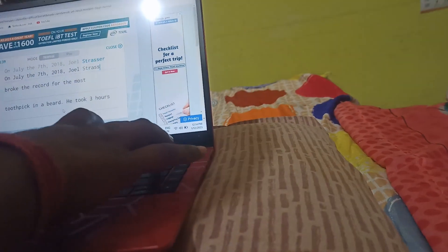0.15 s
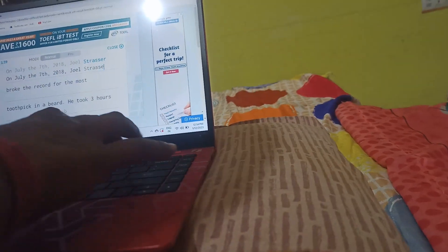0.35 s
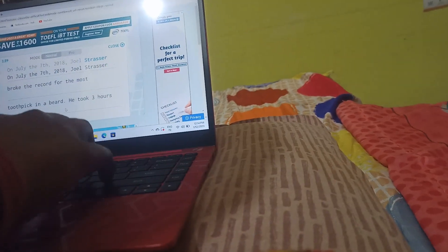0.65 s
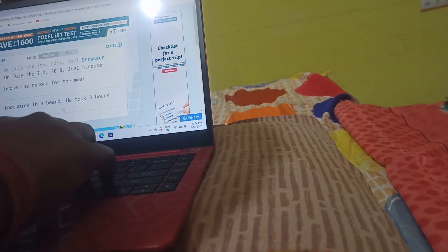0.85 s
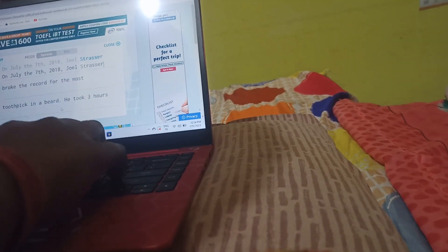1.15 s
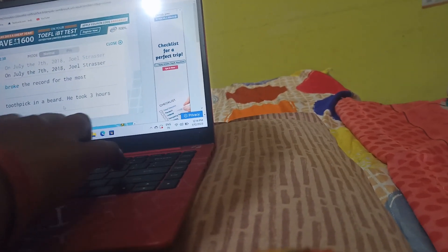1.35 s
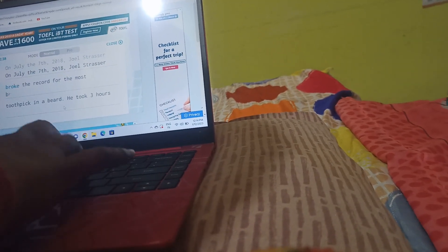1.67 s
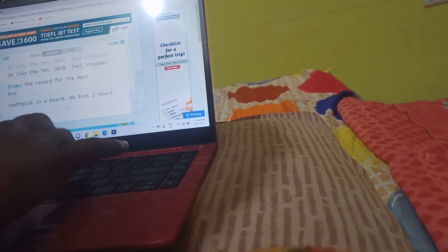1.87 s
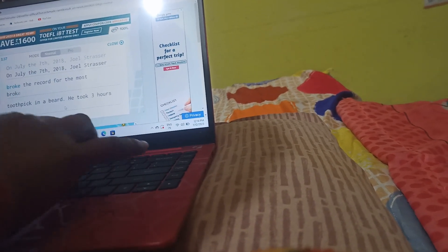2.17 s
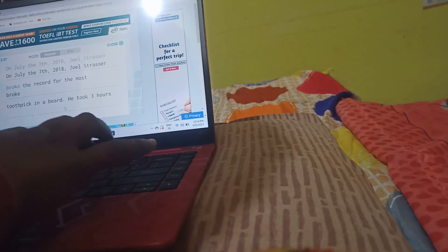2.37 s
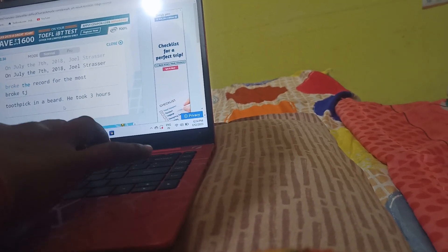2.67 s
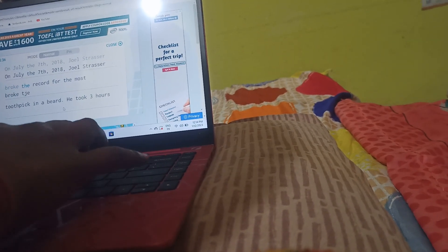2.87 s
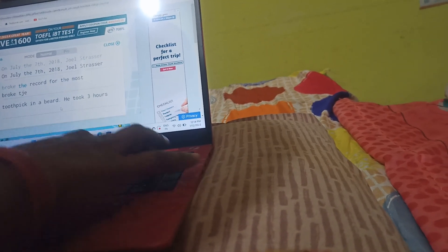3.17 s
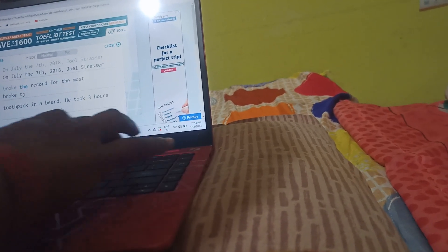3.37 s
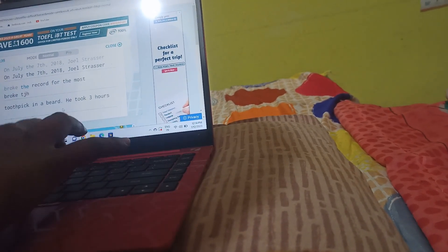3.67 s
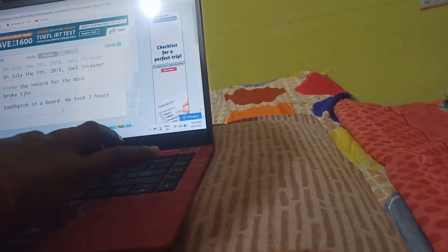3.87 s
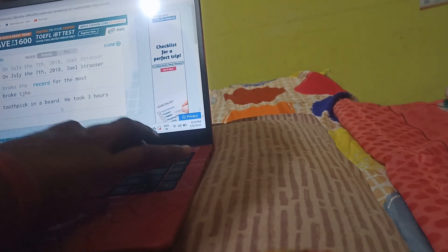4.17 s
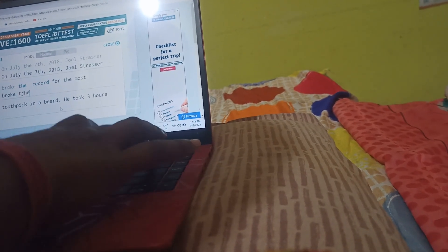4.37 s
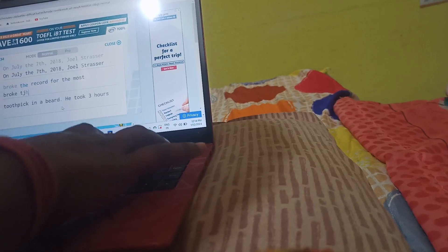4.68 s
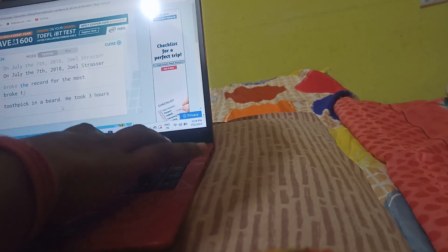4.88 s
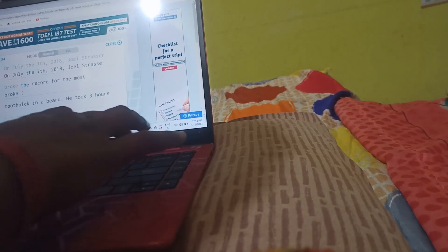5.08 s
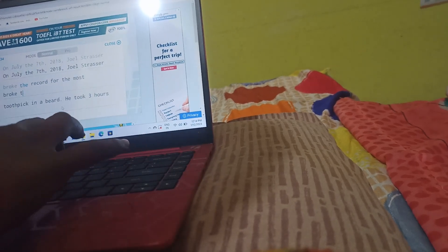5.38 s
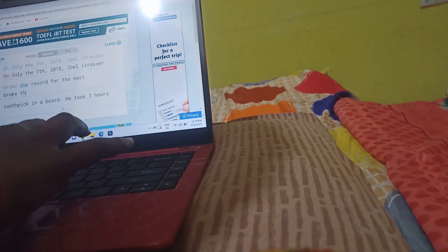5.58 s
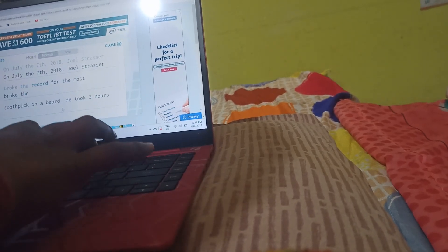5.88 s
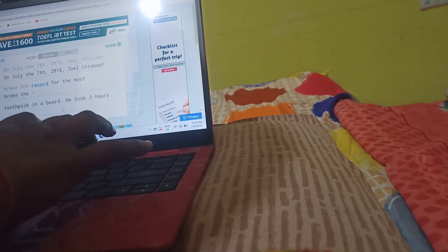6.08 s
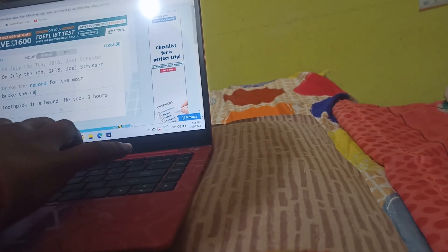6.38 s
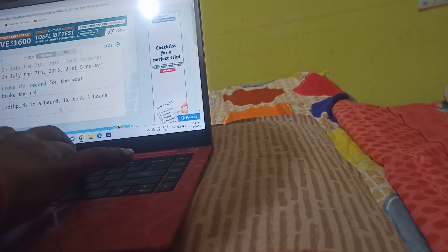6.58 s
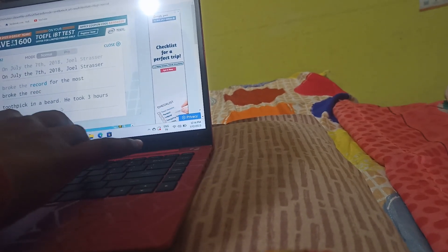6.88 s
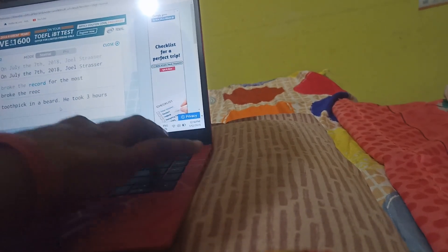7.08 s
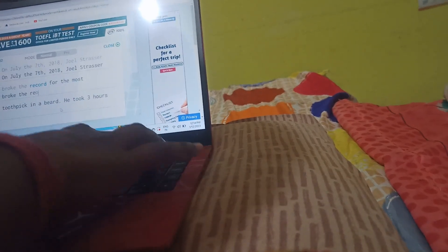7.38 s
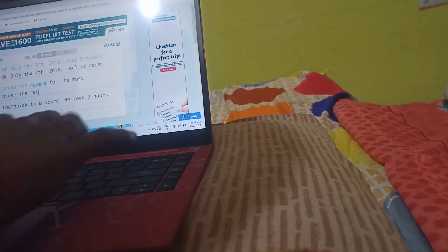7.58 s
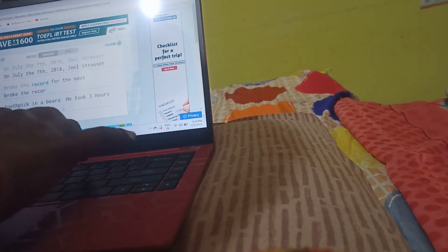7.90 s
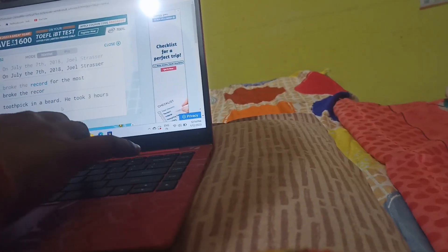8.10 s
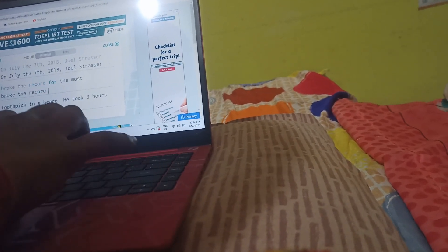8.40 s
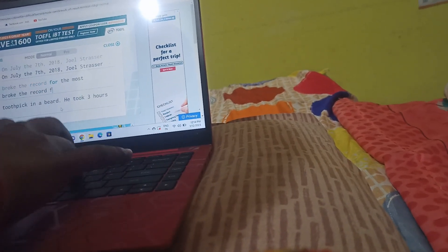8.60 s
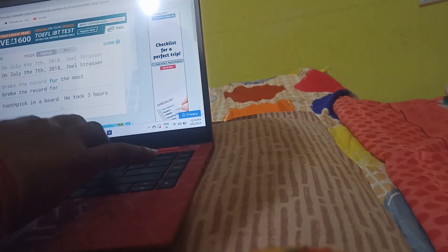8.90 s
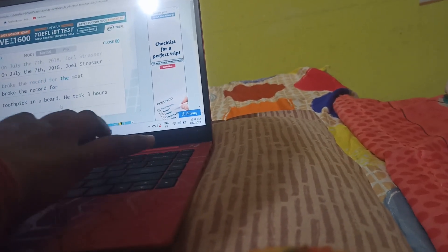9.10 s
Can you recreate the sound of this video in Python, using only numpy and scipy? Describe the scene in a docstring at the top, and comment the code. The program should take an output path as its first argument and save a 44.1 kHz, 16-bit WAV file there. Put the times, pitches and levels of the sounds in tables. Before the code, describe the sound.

A phone vibrating is heard from inside its own case, in a quiet room with faint low noise. The opening has only the falling whirr of a buzz just ended, plus a key tap. Buzzes start near 0.9, 2.9, 4.9, 6.9 and 8.9 seconds, each powered for one second, the last still running at the end. Each begins with a sharp tick and tiny rapid rattle, spins up in a tenth of a second, overshoots, sags to a steady hum around 210 hertz with thin high whine and brushy hiss, then coasts down within a third of a second. Slow, irregular laptop keys click and thump softly throughout, firmer around 7.2 and 9.0. Skin brushes the deck at 4.4 to 4.9. Faint distant wavering tones appear early, near 4.7, and most clearly from 7.5 to 8.1, trailing away by 8.9.

```python
"""A phone's vibration motor buzzes one second on, one second off, heard through the phone's own case.
A spinning off-centre weight hums; brushes and bearing whine and hiss; a loose rotor rattles in short rings.
Each buzz spins up, sags a little in pitch and coasts down; the last is still on when the scene ends.
Someone types slowly on a laptop: bursts of filtered noise click, knock and thump, and skin brushes the deck.
Faint wavering sine tones drift in from far away, over a room tone of low noise."""
import sys
import numpy as np
from scipy import signal
from scipy.fft import rfft, irfft, next_fast_len
from scipy.io import wavfile
from scipy.ndimage import uniform_filter1d, map_coordinates

SR = 44100
rng = np.random.default_rng(int(sys.argv[2]) if len(sys.argv) > 2 else 0)


def generate_wav(sig):
    """Save sig (samples, or channels by samples) to the path in sys.argv[1] as 16-bit PCM at SR."""
    pcm = np.round(np.clip(np.atleast_2d(sig).T, -1, 1) * 32767).astype(np.int16)
    wavfile.write(sys.argv[1], SR, pcm)


N = 407925
TIME = np.arange(N) / SR

# All levels in the tables are relative: gains set later scale them.
# room tone colour: (f/Hz, level/dB)
ROOM_COLOUR = [(15, -53), (25, -17), (156, -2), (509, -24.5), (666, -17.5), (997, -29), (1110, -31),
               (1900, -29.5), (2230, -32.5), (2560, -34), (3440, -31), (4260, -35.5), (5140, -32.5),
               (6380, -47), (15500, -38.5)]
# room tone loudness: (t/s, level/dB)
ROOM_LEVEL = [(0, -65), (.6, -69.5), (2.3, -68), (2.5, -73), (4.3, -73.5), (6.2, -64), (6.8, -71),
              (8.2, -66.5), (8.8, -72)]
# faint far tones: (start t/s, end t/s, f/Hz, level/dB, overtone level/dB)
FAR_TONES = [(-.2, .3, 1140, -80.5, 0.5), (-.2, .45, 1724, -82, -10), (.34, 0.504, 680, -73, -25),
             (.74, .95, 1116, -80.5, -7.5), (4.68, 4.86, 1021, -85, -12),
             (7.55, 8.106, 701.3, -64.5, -18.5), (8.1, 8.881, 680.4, -79.5, -19)]
# skin brushing over the laptop deck: (f/Hz, level/dB)
SLIDE_COLOUR = [(40, -23.5), (160, 3.5), (300, -3), (420, -5), (560, 1.5), (720, -2), (900, -20),
                (1700, -21), (4000, -30.5), (8000, -40)]
# key strokes: (t/s, level/dB, weight/dB: high for a firm press, low for a key let go)
KEYS = [(.002, -53, 4), (.287, -74, 8), (.477, -78, -3), (1.206, -63, 18), (1.542, -57, 12),
        (2.023, -56, 2), (2.167, -52, 9), (2.313, -67, -8), (2.41, -76, 4), (2.54, -69, -12),
        (2.687, -56, 10), (3.279, -52, 1), (3.63, -56, 6), (3.779, -60, 15), (3.933, -52, 10),
        (4.301, -70, -8), (4.498, -69, 12), (4.7, -72, 7), (5.536, -62, 14), (5.835, -60, 17),
        (5.885, -54, -1), (6.261, -66, 11), (6.498, -64.5, 10), (6.599, -66, 3), (7.211, -50, 2),
        (7.398, -51, 5), (7.724, -56, 13), (8.145, -58, 5), (8.322, -64, 2), (8.483, -72, 6),
        (8.618, -63.5, -17), (8.763, -73, -7), (9.041, -48, 7), (9.152, -54, 1)]
# colours of a key's thump, body and click: (f/Hz, level/dB)
THUMP_COLOUR = [(25, -32), (70, -7), (135, 0), (230, -9.5), (340, -16), (700, -49.5), (2000, -72)]
BODY_COLOUR = [(100, -25.5), (300, 6), (500, 9), (800, -5.5), (1300, -22.5), (2500, -34.5), (8000, -62.5)]
CLICK_COLOUR = [(400, -30.5), (1200, -2), (2100, -1.5), (3800, -4.5), (5500, -1), (7500, -15.5),
                (12000, -9), (15500, -22)]
# single ticks of the loose rotor, hard as it breaks free, soft as it drops back:
# (t/s, ring level/dB, dull knock level/dB)
TICKS = [(.9278, -16, -40), (2.1115, -52, -38), (2.9259, -14, -39), (4.1135, -55, -42), (4.9122, -15, -43),
         (4.9254, -15.5, -33), (4.9307, -16, -26), (4.9368, -20, -36), (6.1283, -54, -42),
         (6.9281, -18, -40), (8.938, -19, -39)]
# one row a buzz: (current on t/s, settled speed f/Hz, extra drive at the start f/Hz)
BUZZES = [(-1.11, 210, 44), (.899, 209.4, 46.9), (2.9, 211, 37), (4.901, 214.1, 47), (6.902, 213.2, 41.7),
          (8.904, 214, 40)]
# brushes and bearing over one turn, at cruising speed: (multiple of the speed, level/dB)
TURN = [(5, -45.3), (6, -45.6), (7, -35.1), (8, -26.7), (9, -35.0), (10, -44.8), (11, -39.8), (12, -26.6),
        (13, -33.2), (14, -41.0), (15, -33.3), (16, -37.7), (17, -45.8), (18, -39.4), (19, -40.1),
        (20, -36.8), (21, -36.3), (22, -32.2), (23, -31.9), (24, -27.7), (25, -27.2), (26, -29.6),
        (27, -29.4), (28, -32.5), (29, -30.6), (30, -35.6), (31, -29.3), (32, -30.8), (33, -35.6),
        (34, -35.7), (35, -46.7), (36, -36.8), (37, -26.9), (38, -30.7), (39, -37.5), (40, -26.8),
        (41, -34.6), (42, -24.2), (43, -25.2), (44, -23.5), (45, -34.8), (46, -36.7), (47, -28.1),
        (48, -33.0), (49, -25.6), (50, -24.7), (51, -35.4), (52, -27.2), (53, -27.0), (54, -19.9),
        (55, -21.7), (56, -25.2), (57, -25.1), (58, -30.3), (59, -21.4), (60, -30.1), (61, -22.0),
        (62, -29.0), (63, -31.2), (64, -23.1), (65, -36.2), (66, -38.8), (67, -41.9), (68, -32.2),
        (69, -34.5), (70, -34.5), (71, -35.9), (72, -46.4)]
# how the case carries the motor's sound: (f/Hz, level/dB)
CASE = [(300, -37.5), (1100, -34.5), (1500, -7), (1950, -0.5), (2350, -7.5), (3300, -1), (4200, -9),
        (5300, 1.5), (7500, -12), (9000, 3.5), (12300, 15.5), (14000, 0.5), (15500, -15)]
# hiss of the brushes with the current on, and while coasting: (f/Hz, level/dB)
BRUSH_HISS = [(30, -20), (120, 0), (300, -5), (650, -8), (950, -20), (1800, -13), (2500, -19), (3800, -19),
              (5300, -12), (7500, -17), (9500, -9), (12300, 1), (13500, -2), (14300, -8)]
COAST_HISS = [(30, -18), (150, 6), (500, -2), (1000, -13), (2000, -11.5), (3800, -18.5), (5500, -7.5),
              (6800, -14.5), (7900, -12.5), (8800, 0), (12700, 2), (14300, -3), (15500, -19.5)]
# the shaft's knock against its bearing: (f/Hz, level/dB)
SHAFT_KNOCK = [(300, -26.5), (1200, -17), (1950, 2), (2500, -12.5), (5300, 4), (7500, -2.5), (11000, -1.5),
               (15000, -8.5)]
# the shaft grating on the lowest resonance of the case: (f/Hz, level/dB)
GRATE_COLOUR = [(900, -40), (1500, -7), (1950, 0), (2400, -8), (3600, -10), (6000, -30)]

SLIDE_START_S, SLIDE_END_S, SLIDE_DB = 4.445, 4.92, -64.5
SLIDE_ATTACK_S, SLIDE_RELEASE_S = .03, .22
DULLING = .12  # share of the weight that a firm press moves from the click into the deck
# rattle at switch-on: spacing of its ticks, first and full ring level, time to grow
RATTLE_GAP_S, RATTLE_FIRST_DB, RATTLE_DB, RATTLE_GROW_S = .0061, -45, -27, .014
DULL_FIRST_DB, DULL_DB = -62, -34.5  # first and full level of the dull knock in those ticks
CRUISE_HZ = 215  # motor speed for which TURN holds
ON_S = 1.0  # current stays on this long
STUCK_S = .017  # the rotor is stuck this long before it breaks free
SAG_S = .237  # the extra drive dies away, so the pitch sags
GRATE_DB = -58
TOP_HZ = 15540  # upper edge of the sound


def amp(db):
    """Turns decibels into a gain."""
    return 10 ** (np.asarray(db) / 20)


def unit(x):
    """Scales a sound to rms 1."""
    return x / np.sqrt(np.mean(x ** 2) + 1e-20)


def read(points, hz):
    """Reads a spectrum between its points on a log-frequency axis."""
    f, value = np.transpose(points)
    return np.interp(np.log(hz + 1), np.log(f + 1), value)


def curve(points):
    """Joins (t/s, value) rows with straight lines over the whole scene."""
    return np.interp(TIME, *np.transpose(points))


def colour(x, points):
    """Filters a sound by a spectrum in dB."""
    size = next_fast_len(len(x) + 4096)
    gain = amp(read(points, np.fft.rfftfreq(size, 1 / SR)))
    return irfft(rfft(x, size) * gain, size)[:len(x)]


def noise(points):
    """Makes steady noise of a given colour, rms 1."""
    return unit(colour(rng.standard_normal(N), points))


def wander(per_s):
    """Makes a smooth random curve, rms 1, from per_s random points a second."""
    knots = rng.standard_normal(4096)
    return unit(map_coordinates(knots, [TIME * per_s], order=2, mode="wrap"))


def add(mix, s, sound):
    """Mixes a sound in at time s, in seconds."""
    part = mix[max(round(s * SR), 0):][:len(sound)]
    part += sound[:len(part)]


def room():
    """Room tone: low noise that swells gently."""
    return amp(curve(ROOM_LEVEL) + 0.6 * wander(19)) * noise(ROOM_COLOUR)


def far_tones():
    """Thin sine tones with one overtone, wavering in pitch and level on their way in."""
    out = np.zeros(N)
    clock = np.cumsum(1 + 0.011 * wander(40)) / SR  # uneven time bends the pitch
    for start, end, hz, db, overtone_db in FAR_TONES:
        swell = np.clip(np.minimum(TIME - start, end - TIME) / 0.04, 0, 1)
        at = swell > 0
        phase = 2 * np.pi * hz * clock[at]
        tone = np.sin(phase) + amp(overtone_db) * np.sin(2 * phase)
        out[at] += swell[at] * amp(db) * tone
    return out * amp(1.8 * wander(30))


def slide():
    """Skin brushing over the deck makes noise: it lands quickly and lifts slowly."""
    landing = (TIME - SLIDE_START_S) / SLIDE_ATTACK_S
    lifting = (SLIDE_END_S - TIME) / SLIDE_RELEASE_S
    touch = np.clip(np.minimum(landing, lifting), 0, 1)
    return touch * amp(SLIDE_DB + .8 * wander(33)) * noise(SLIDE_COLOUR)


def strokes(times, levels_db, rise, decay, rebound, tail_db, tail_s):
    """Loudness of all key strokes in one band: the hit, the key bottoming out, the room's tail."""
    out, t = np.zeros(N), np.arange(SR // 3) / SR
    later = np.maximum(t - .015, 0)  # the key bottoms out 15 ms after the hit
    hit = (1 - np.exp(-t / rise)) * (np.exp(-t / decay) + amp(tail_db) * np.exp(-t / tail_s))
    hit += rebound * (1 - np.exp(-later / rise)) * np.exp(-later / decay)
    hit /= np.sqrt(np.mean(hit[:SR // 50] ** 2))  # the first 20 ms set the level
    for s, db in zip(times, levels_db):
        add(out, s - .001, amp(db) * hit)
    return out


def typing():
    """Keys click, the deck knocks, and under a firm press the laptop thumps on the bed."""
    s, db, weight_db = np.transpose(KEYS)
    dull_db = DULLING * weight_db
    thump = strokes(s, db + weight_db, rise=0.0042, decay=.018, rebound=0.26, tail_db=-15.5, tail_s=0.059)
    body = strokes(s, db + dull_db, rise=0.00062, decay=0.0053, rebound=.2, tail_db=-7, tail_s=0.012)
    click = strokes(s, db - dull_db, rise=.0008, decay=.0022, rebound=.3, tail_db=-15, tail_s=.048)
    # the key caps rattle unevenly as they die away
    caps = amp(3 * wander(350) - 1)
    return thump * noise(THUMP_COLOUR) + body * noise(BODY_COLOUR) + click * noise(CLICK_COLOUR) * caps


def rattle(count=6, spread_db=1.5):
    """Lists ticks like TICKS: at switch-on the rotor bounces in its play, soon harder, with some chance."""
    rows = []
    for on, _, _ in BUZZES[1:]:
        jitter, loud, dull = rng.standard_normal((count, 3)).T
        after = RATTLE_GAP_S * np.arange(count) * (1 + .04 * jitter)
        young = np.maximum(1 - after / RATTLE_GROW_S, 0)  # 1 at the first tick, 0 once fully grown
        ring_db = RATTLE_DB + (RATTLE_FIRST_DB - RATTLE_DB) * young + spread_db * loud
        dull_db = DULL_DB + (DULL_FIRST_DB - DULL_DB) * young ** 2 + spread_db * dull
        rows += zip(on + after, ring_db, dull_db)
    return rows


def ticks(ring_hz=12500, knock_hz=5500, ring_db=1, rustle_db=-30, rustle_s=.005):
    """Each tick is a short high ring of the motor can, a duller knock, and a brief rustle of the case."""
    out, t = np.zeros(N), np.arange(-66, 900) / SR
    # ring and knock swell up to t = 0 and die away after it
    ring_fade, knock_fade = np.exp(-abs(t) / .00015), np.exp(-abs(t) / .00008)
    rustle_fade = (t > 0) * np.exp(-abs(t) / rustle_s)
    for s, db, dull_db in TICKS + rattle():
        ring = ring_fade * np.cos(2 * np.pi * ring_hz * rng.uniform(.96, 1.04) * t)
        knock = knock_fade * np.sin(2 * np.pi * knock_hz * t + rng.uniform(0, 2 * np.pi))
        rustle = colour(rustle_fade * rng.standard_normal(len(t)), CASE)
        bright = amp(db) * (amp(ring_db) * ring + amp(rustle_db) * rustle)
        add(out, s + t[0], bright + amp(dull_db) * knock)
    return out


def rotor(spin_up=.094, run_down=.128, friction_hz=4, stop_s=.34, stop_fade_s=.17):
    """Speed in Hz and current (0 to 1): a run-up under sagging drive, then drag and friction stop the rotor."""
    speed, current = np.zeros(N), np.zeros(N)
    for on, settled_hz, extra_hz in BUZZES:
        run = np.maximum(TIME - on - STUCK_S, 0)
        coast = np.maximum(TIME - on - ON_S, 0)
        target = settled_hz + extra_hz * np.exp(-run / SAG_S)
        driven = target * (1 - np.exp(-run / spin_up))
        free = (driven + friction_hz) * np.exp(-coast / run_down) - friction_hz
        speed += np.maximum(free, 0) * np.clip((stop_s - coast) / stop_fade_s, 0, 1)
        current += (run > 0) & (coast == 0)
    # the speed trembles slightly; the current switches over about 3 ms
    return speed * (1 + .0006 * wander(60)), uniform_filter1d(current, 130)


def whine(turns, k, db, scatter):
    """The same rough track is rubbed every turn, but the rotor seats a little differently at each start."""
    seat, twist = rng.standard_normal((2, len(BUZZES), len(k)))
    tracks = np.zeros((len(BUZZES), 4097), complex)
    # with little scatter the multiples k line up into one tick a turn
    tracks[:, np.round(k).astype(int)] = amp(db + 1.8 * seat) * np.exp(1j * scatter * k * twist)
    shapes = irfft(tracks) * (tracks.shape[1] - 1) * np.sqrt(2)  # one turn's waveform for each buzz
    buzz = np.searchsorted([on for on, _, _ in BUZZES[1:]], TIME)
    place = (turns % 1 * shapes.shape[1]).astype(int)
    return shapes[buzz, place]


def motor(hum_db=-27.5, bearing_db=-28.7, brush_db=-28.0, brush_hiss_db=-46.3, coast_whine_db=-4,
          coast_hiss_db=-42, chatter_db=-46, knock_db=-18, mount_hz=62):
    """The off-centre weight shakes the case; brushes and bearing add whine, hiss and chatter."""
    speed, current = rotor()
    turns, pace = np.cumsum(speed) / SR, speed / CRUISE_HZ
    coasting = 1 - current
    # the shaking force grows about with the square of the speed; a slow weight hardly moves the held phone
    shake = pace ** 2.2 * speed ** 6 / (speed ** 6 + mount_hz ** 6)
    hum = amp(hum_db + .2 * wander(25)) * shake * np.sqrt(2) * np.sin(2 * np.pi * turns)
    grip = current * pace ** .5 + coasting * amp(coast_whine_db) * pace ** 1.88
    # the bearing's low multiples sweep through the resonances of the case
    k, db = np.transpose(TURN[:15])
    before_case_db = db - read(CASE, k * CRUISE_HZ)
    bearing = amp(bearing_db) * colour(grip * whine(turns, k, before_case_db, scatter=0.12), CASE)
    # the brushes rasp once a turn, and sing the highest multiples only near full speed
    rasp = pace ** 1.3 * whine(turns, *np.transpose(TURN[15:32]), scatter=0.038)
    song = pace ** 4 * whine(turns, *np.transpose(TURN[32:]), scatter=.06)
    brushes = amp(brush_db + 0.25 * wander(150)) * grip * (rasp + song)
    hiss = amp(brush_hiss_db) * current * pace ** .45 * noise(BRUSH_HISS)
    hiss += amp(coast_hiss_db) * coasting * pace ** 1.29 * noise(COAST_HISS)
    # six commutator gaps pass the brushes in a turn, and the hiss pulses with them
    gaps = np.cos(2 * np.pi * 6 * turns)
    hiss *= 1 + .5 * gaps
    # under high torque the shaft chatters and knocks once a turn, until it is pressed to one side
    torque = current * np.sqrt(np.clip(.97 - pace, 0, 1) * np.minimum(pace * 1.7, 1))
    chatter = amp(chatter_db) * colour(torque * pace ** .5 * rng.standard_normal(N), CASE)
    once_a_turn = np.diff(np.floor(turns), prepend=0)
    knocks = amp(knock_db) * colour(torque * once_a_turn, SHAFT_KNOCK)
    # the driven shaft grates most while it is slow
    grate = amp(GRATE_DB) * current * np.clip(1 - pace, 0, 1) * noise(GRATE_COLOUR)
    return hum + bearing + brushes + hiss + chatter + knocks + grate


def scene():
    """Adds all sources up; both channels carry the same sound."""
    mono = room() + far_tones() + slide() + typing() + ticks() + motor()
    return np.array([mono, mono])


def record(dry, low_cut_hz=65):
    """Weakens the lows below low_cut_hz and removes the highs above TOP_HZ."""
    low_cut = signal.butter(3, low_cut_hz, "highpass", fs=SR, output="sos")
    thin = signal.sosfilt(low_cut, dry)
    band_limit = signal.firwin(1023, TOP_HZ, window=("kaiser", 9), fs=SR)
    return signal.oaconvolve(thin, band_limit[None], "same", axes=1)


dry = scene()
out = record(dry)
generate_wav(out)
```